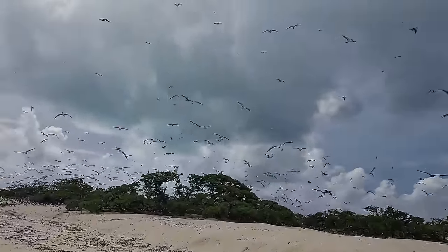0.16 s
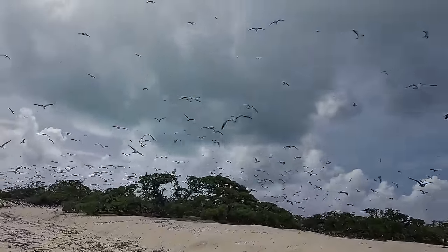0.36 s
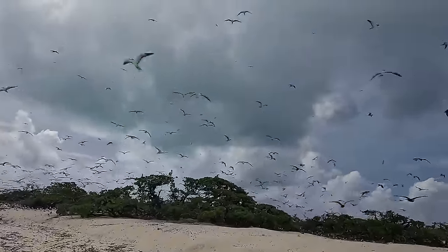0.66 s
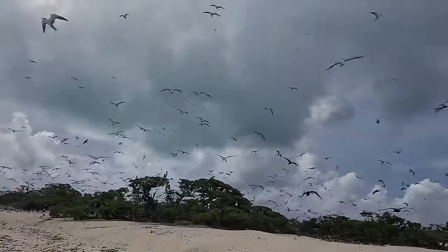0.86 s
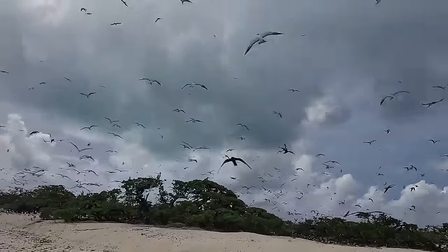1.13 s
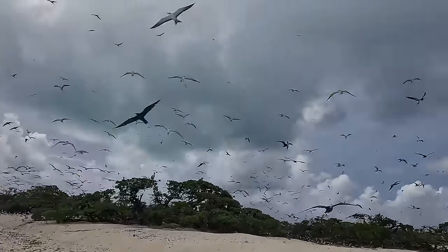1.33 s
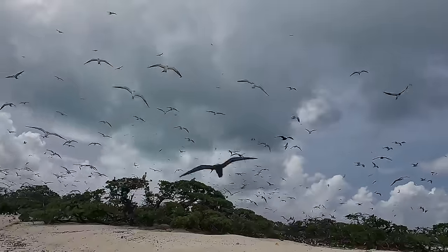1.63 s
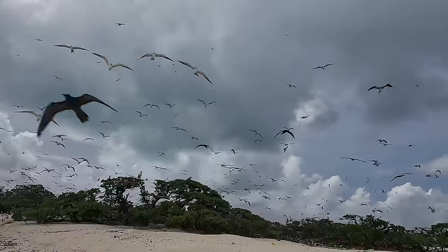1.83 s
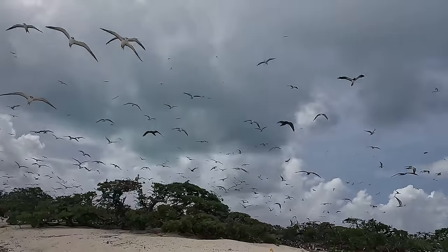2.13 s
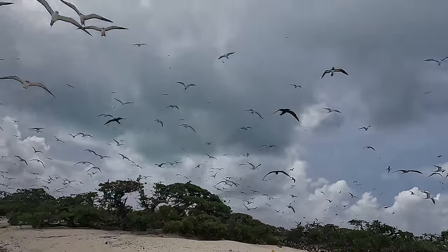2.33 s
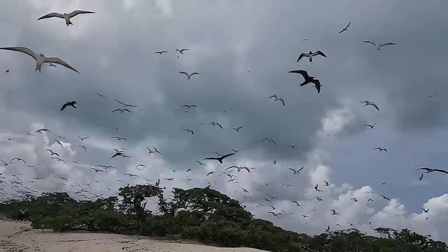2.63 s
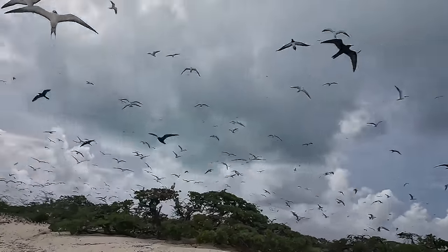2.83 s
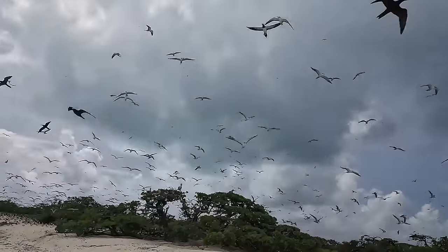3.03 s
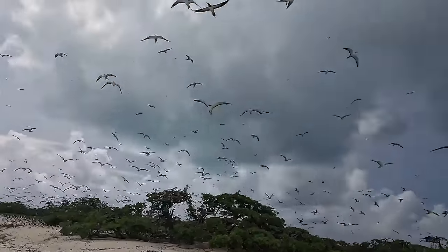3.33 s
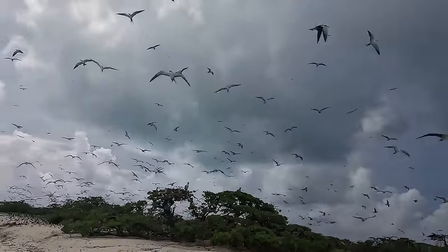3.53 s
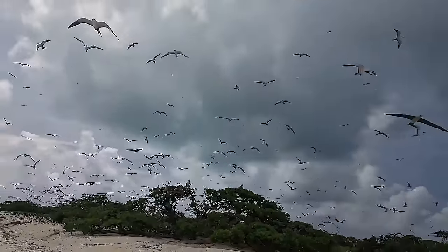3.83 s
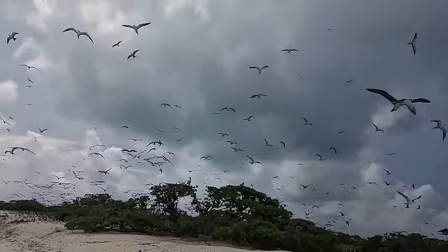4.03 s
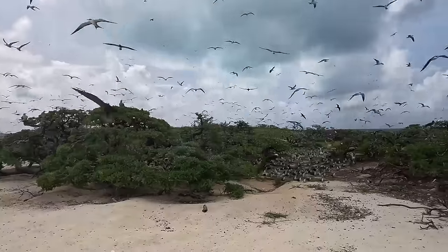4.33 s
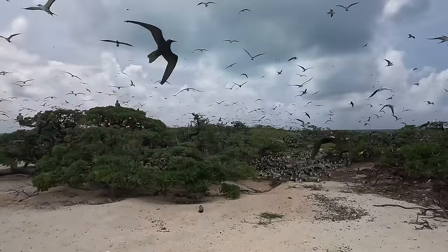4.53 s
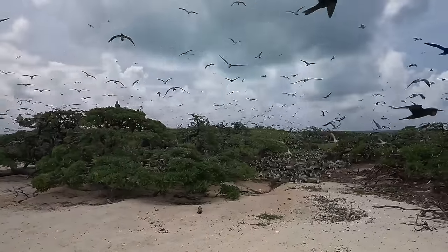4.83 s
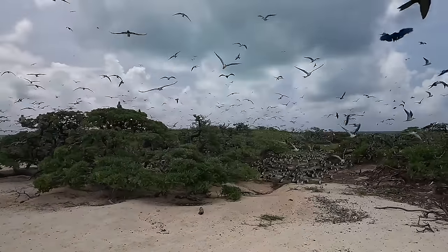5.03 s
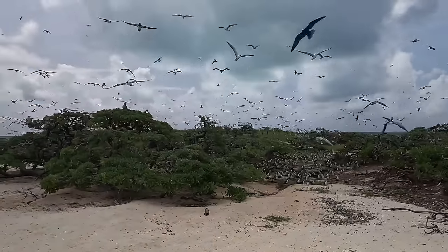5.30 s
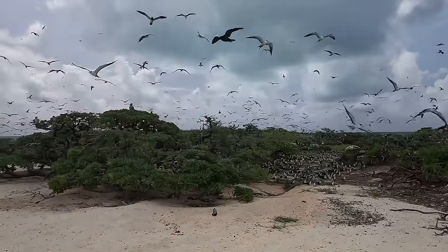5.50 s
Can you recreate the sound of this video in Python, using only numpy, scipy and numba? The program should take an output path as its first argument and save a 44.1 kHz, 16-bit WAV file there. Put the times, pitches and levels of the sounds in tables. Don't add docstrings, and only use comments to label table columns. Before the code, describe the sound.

A huge tern colony shrieks overhead in a high rasping din, with close cries, wind thumps and one abrupt short dropout.

```python
import sys
import numpy as np
from scipy import signal
from scipy.fft import rfft, irfft
from scipy.io import wavfile
from scipy.ndimage import uniform_filter1d, minimum_filter1d
from numba import njit

SR = 44100
rng = np.random.default_rng(int(sys.argv[2]) if len(sys.argv) > 2 else 0)


def dump(signal):
    limited = np.clip(np.atleast_2d(signal).T, -1, 1)
    pcm = np.round(limited * 32767).astype(np.int16)
    wavfile.write(sys.argv[1], SR, pcm)


def nominal_scale(level):
    x = np.asarray(level, float) / 20
    return 10 ** x


N = 249606

# freq_hz, density_db_per_hz
VOICE_COLOUR = [(470, -32.5), (800, -24.5), (1070, -26), (1250, -24.5), (2270, -1.5), (2620, 1), (3690, -8),
                (4100, -14.5), (5160, -11.5), (6250, -27), (7140, -27.5), (7860, -36.5), (8500, -45.5),
                (8750, -47.5)]
# freq_hz, density_db_per_hz
TREBLE_COLOUR = [(9200, -48), (9600, -44.5), (10400, -41), (10900, -51), (11300, -59.5), (12000, -58),
                 (12800, -61.5), (13500, -67.5), (15000, -73)]
NULL_FROM_HZ, NULL_TO_HZ = 8760, 9230


def birds():
    hz = np.fft.rfftfreq(N, 1 / SR)
    above_null = response(TREBLE_COLOUR) * (hz > NULL_TO_HZ)
    colour = np.where(hz < NULL_FROM_HZ, response(VOICE_COLOUR), above_null)
    mass, loudness = flock(colour)
    return irfft((rfft(mass) + rfft(close_birds()) / loudness) * colour, N)


def flock(colour):
    level_db, bright_db = flock_db()
    blur_colour = response([(1000, 2.5), (3000, -0.5), (15000, -9.0)])
    distant = irfft(rfft(rng.standard_normal(N)) * blur_colour, N)
    callers = crowd(count=520, spread_db=12, tilt_db=-.2, uneven_db=2.5, rough=.015)
    far = nominal_scale(-7.5) * unit(distant) + nominal_scale(-1.2) * callers
    heard = irfft(rfft(far) * colour, N)
    steady = far / np.sqrt(uniform_filter1d(heard ** 2, int(.07 * SR)))
    hz = np.fft.rfftfreq(N, 1 / SR)
    upper = irfft(rfft(steady) * np.clip((hz - 3500) / 1000, 0, 1), N)
    mass = (steady + upper * (nominal_scale(bright_db) - 1)) * nominal_scale(level_db + duck_db() + 0.42)
    return mass, np.std(heard)


# time_s, level_db, brightness_db
FLOCK_PASSES = [
    [(0.02, -16, .5), (.45, -17.5, 0), (.82, -17.5, 1), (1.05, -21, 1), (1.26, -17, -2), (1.5, -17.5, 1.5),
     (1.7, -15.5, 1), (2.3, -16.5, -1), (2.56, -14.5, 1), (2.82, -18, -2), (3.03, -16.5, 3),
     (3.2, -18.5, -0.3), (3.55, -16.5, 2), (4.16, -19, 0)],
    [(4.381, -15.5, 1.5), (4.86, -14.5, 0.5), (5.0, -14, 1.5), (5.63, -16, -0.5)],
]
# time_s, width_s, level_db, brightness_db
FLOCK_SURGES = [(.2, 0.035, 0.5, -0.5), (.69, 0.014, -4, -2), (.87, 0.022, -2, 1.5), (1.1, .04, -1, -2.5),
                (1.63, .04, 1.5, 0), (2.3, .03, -.5, -2.5), (3.6, .04, -0.5, 3), (3.76, .07, 0, -2.5),
                (3.96, .05, -.5, 3.5), (4.54, .04, -1.5, -2), (4.885, .02, -2.5, -1), (5.46, 0.023, -4, 1),
                (5.577, .025, -1, -5.5)]


def flock_db():
    t = np.arange(N) / SR
    levels = np.array(curve(FLOCK_PASSES))
    for s, width_s, level_db, bright_db in FLOCK_SURGES:
        levels += np.exp(-((t - s) / width_s) ** 2) * np.array([[level_db], [bright_db]])
    return levels


# time_s, pitch_share of the bird's own, level_db
TERN_CALL = [
    [(0, 0.77, -13.5), (.03, 0.75, -1.5), (.06, .84, 1.5), (.085, 1.03, 5), (.12, 1.14, -1)],
    [(.14, 1.1, -1), (.165, .96, -2)],
    [(.18, .98, -1), (.2, 1.04, -3.5), (.225, .97, -8.5)],
]


def crowd(count, spread_db, tilt_db, uneven_db, rough):
    out, wobble = np.zeros(N), rough * walk(250)
    for when, high, slow, wide, far, shift in rng.random((count, 6)):
        partials = throat(tilt_db, uneven_db)
        for note in TERN_CALL:
            s, share, db = np.transpose(note)
            s = when * (N / SR + .3) - .3 + s * (.5 + .55 * slow)
            hz = share ** (1.4 * wide - .35) * (680 + 360 * high)
            if 0 < s[0] < N / SR:
                points = np.transpose([s, hz, db - spread_db * far])
                sing(out, points, wobble[int(shift * N / 2):], partials, .012)
    return unit(out)


# freq_hz, gain_db
CLOSENESS_COLOUR = [(900, 1), (1400, 2.5), (1900, -17), (2300, -3), (2800, -4), (3300, 0.5), (3900, 1.5),
                    (5500, 0.5), (6500, -1.5), (10000, -0.5), (14000, 0.5)]
DUCK_FROM_DB, DUCK_RATIO, DUCK_S = -22.5, 0.84, .03
AIR_DB = .03


def close_birds():
    close, wobble = np.zeros(N), 0.0035 * walk(250)
    for note, (tilt_db, third_db) in close_notes():
        slope_db = tilt_db + AIR_DB * (note[1][2] - DUCK_FROM_DB)
        third_harmonic = nominal_scale(third_db * (np.arange(32) == 2))
        partials = throat(slope_db, uneven_db=1.1) * third_harmonic
        sing(close, note, wobble[int(note[0][0] * SR / 2):], partials, .01)
    return irfft(rfft(close * nominal_scale(-3.5)) * response(CLOSENESS_COLOUR), N)


# start_s, length_s, low_hz, top_hz, level_db
SWOOP_NOTES = [(.065, .1, 717, 1106, -28.5), (0.214, .05, 870, 1066, -21), (.43, .105, 714, 1043, -21.5),
               (0.636, 0.042, 831, 1026, -32), (3.182, .06, 695, 730, -28.5), (4.575, .065, 761, 832, -22),
               (4.981, .14, 581, 886, -22.5), (5.123, .06, 759, 963, -23), (5.247, .07, 641.4, 792, -24.5),
               (5.376, .112, 662, 1077, -22.5), (5.56, .045, 610, 643, -24.5)]
# start_s, length_s, start_hz, end_hz, level_db
CLIMB_NOTES = [(.32, .035, 833, 969, -26.5), (.84, .05, 873, 910, -27), (0.923, .03, 807, 840, -28.5),
               (1.245, .03, 843, 864, -27), (1.455, .03, 842, 959, -23), (1.662, .04, 993, 1037, -28.5),
               (1.714, .025, 968, 987, -22.5), (1.912, .08, 891, 1138, -19.5),
               (2.051, .032, 1100, 1128, -22), (2.17, .045, 699, 803.4, -27),
               (2.746, 0.04, 833, 881.4, -29), (2.865, .085, 952, 1032, -28.5),
               (3.0, .065, 843, 909, -24.5), (3.223, .03, 871, 891, -25), (3.546, .045, 636, 720, -23),
               (3.6, 0.039, 917, 970, -22.5), (3.76, .045, 737, 786, -30.5), (4.38, 0.019, 945, 1063, -22),
               (4.717, .045, 852, 1012, -18.5), (4.768, .042, 672, 730, -21), (5.292, .022, 858, 982, -21),
               (5.318, .039, 864, 1078, -16.5)]
# start_s, length_s, start_hz, end_hz, level_db
DROP_NOTES = [(.55, .015, 987, 890, -21), (.575, 0.019, 932, 850, -23), (.72, .025, 673, 622, -24.5),
              (1.295, 0.039, 940, 903.8, -25.5), (1.86, .035, 928, 803, -22),
              (2.215, 0.023, 804, 687, -24.5), (2.7, .03, 738, 703, -25), (3.82, .03, 918, 900, -31),
              (4.435, .025, 775, 729, -21.5), (4.66, .035, 826, 819.8, -21.5),
              (4.64, .024, 838, 692, -24.5), (5.365, .06, 957, 942, -16), (5.52, .015, 885, 865, -20)]
# start_s, length_s, edge_hz, middle_hz, level_db
ARCH_NOTES = [
    (3.46, .08, 840, 965, -26.5),
    (4.815, .06, 810, 870, -24),
    (5.039, .09, 815, 992, -20),
    (5.225, .092, 1060, 814, -21),
]
# start_s, length_s, start_hz, end_hz, level_db
SLIDE_NOTES = [
    (2.016, .027, 1150, 965, -20.5),
    (2.118, .024, 861, 985, -20),
    (3.4, .045, 935, 856, -26.5),
    (3.55, .04, 830, 965, -26),
    (5.16, .045, 835, 1055, -20),
    (3.05, .06, 905, 830, -24.5),
    (5.085, .04, 830, 905, -22.5),
    (.185, .03, 830, 985, -22.5),
]
# length_share, glide_share, level_db
SWOOP_SHAPE = [(0, .05, 1), (.25, 0, -1.5), (.48, .12, -2), (.72, .78, 0.5), (1, 1, 2)]
# length_share, glide_share, level_db
CLIMB_SHAPE = [(0, 0, 0), (.5, .6, .5), (1, 1, -0.22)]
# length_share, glide_share, level_db
DROP_SHAPE = [(0, 0, 1), (.4, .2, 0.61), (1, 1, -1.2)]
# length_share, glide_share, level_db
ARCH_SHAPE = [(0, 0.021, -0.91), (0.219, .65, 0), (.45, 0.96, .5), (.72, .75, -0.088), (1, 0.025, -.5)]
# length_share, glide_share, level_db
SLIDE_SHAPE = [(0, 0, 0), (.4, 0.63, 0.46), (1, 1, -.5)]
# slope in dB per harmonic, lift of the third harmonic in dB
SHRILL, MELLOW = (-.025, 0), (-.35, 6)


def close_notes():
    kinds = ((SWOOP_NOTES, SWOOP_SHAPE, SHRILL), (CLIMB_NOTES, CLIMB_SHAPE, SHRILL),
             (DROP_NOTES, DROP_SHAPE, SHRILL), (ARCH_NOTES, ARCH_SHAPE, MELLOW),
             (SLIDE_NOTES, SLIDE_SHAPE, MELLOW))
    notes = []
    for rows, shape, voice in kinds:
        for s, length_s, start_hz, end_hz, level_db in rows:
            points = [(s + at * length_s, start_hz + glide * (end_hz - start_hz), level_db + db)
                      for at, glide, db in shape]
            notes.append((points, voice))
    return notes


def duck_db():
    t, over = np.arange(N) / SR, np.zeros(N)
    for rows in (SWOOP_NOTES, CLIMB_NOTES, DROP_NOTES, ARCH_NOTES, SLIDE_NOTES):
        for s, length_s, _, _, level_db in rows:
            sounding = (t > s) & (t < s + length_s)
            over = np.maximum(over, sounding * max(level_db - DUCK_FROM_DB, 0))
    return -DUCK_RATIO * uniform_filter1d(over, int(DUCK_S * SR))


def throat(tilt_db, uneven_db):
    size, turn = rng.standard_normal(32), rng.random(32)
    return nominal_scale(tilt_db * np.arange(len(size)) + uneven_db * size) * np.exp(2j * np.pi * turn)


def sing(out, note, shake, partials, edge_s):
    s, hz, db = np.transpose(note)
    t = np.arange(max(s[0] - edge_s / 2, 0), s[-1] + edge_s / 2, 1 / SR)
    pitch = uniform_filter1d(np.interp(t, s, hz), int(.012 * SR)) * (1 + shake[:len(t)])
    edge = np.clip(np.minimum(t - s[0] + edge_s / 2, s[-1] + edge_s / 2 - t) / edge_s, 0, 1)
    strength = nominal_scale(np.interp(t, s, db) + 210 * shake[-len(t):])
    syrinx(out, int(t[0] * SR), pitch, strength * edge ** 2, partials)


@njit
def syrinx(out, start, hz, gain, partials):
    turn = 0.
    for i in range(min(len(hz), len(out) - start)):
        turn += hz[i] / SR
        z = np.exp(2j * np.pi * turn)
        p, total = z, 0.
        for k in range(min(int(15000 / hz[i]), len(partials))):
            total += (p * partials[k]).imag
            p *= z
        out[start + i] += gain[i] * total


# freq_hz, density_db_per_hz
TURBULENCE_COLOUR = [(15, -36.5), (27, -11), (48, -1.5), (92, -0.5), (358, -5), (482, -6.5), (818, -5.5),
                     (1030, -11), (1300, -4), (1690, -33), (2860, -120)]
# time_s, rush_share (0-1), pitch_hz
PORT_WHISTLE = [
    (3.2, 0.01, 391),
    (3.3, 0.65, 384),
    (3.58, 0.97, 372),
    (3.72, 0.94, 400),
    (3.8, 0.76, 437),
    (3.87, 0.91, 550),
    (3.96, 0.6, 514),
    (4.03, 0, 500),
]


def wind():
    share, whistle_hz = curve([PORT_WHISTLE])
    share = np.clip(share, 0, 1)
    buffet_db, rush_db = gusts(share)
    hz = np.fft.rfftfreq(N, 1 / SR)
    air = rfft(rng.standard_normal(N)) * response(TURBULENCE_COLOUR)
    edges_hz = [0, 55, 290, 750, 3000]
    bands = [unit(irfft(air * (hz > a) * (hz <= b), N)) for a, b in zip(edges_hz, edges_hz[1:])]
    deep, low, rush, surf = bands
    out = deep * nominal_scale(0.97 * buffet_db - 13 + 3.8 * walk(9.9))
    out += low * nominal_scale(buffet_db - 0.24 + 2.26 * walk(18))
    whistle = svf(rng.standard_normal(N), whistle_hz, 140.)
    whistle = unit(svf(whistle, whistle_hz, 180.))
    over_port = np.sqrt(1 - share) * rush + np.sqrt(share) * whistle
    out += over_port * nominal_scale(rush_db - 0.4 + 0.85 * walk(20))
    out += surf * nominal_scale(0.24 * rush_db - 35.0)
    return out + thumps()


# time_s, level_db
STEADY_WIND = [
    [(0.03, -39.5), (.2, -37), (.5, -38.5), (.9, -44.5), (1.4, -40), (1.9, -39), (2.5, -38.5), (3.0, -41),
     (3.35, -37), (3.8, -33), (4.16, -26.5)],
    [(4.381, -39), (4.6, -40.5), (4.74, -36), (5.07, -42), (5.3, -38.5), (5.62, -37.5)],
]
# time_s, width_s, lift_db, rush_share
WIND_GUSTS = [(.084, 0.048, 5.5, 1.2), (.543, .025, 7.5, 1.4), (.65, .025, 12, 1), (.697, .015, -4, 1.1),
              (.78, 0.025, 16, 0.67), (1.33, .04, 3.5, 1), (1.783, 0.045, 2, 0.28), (3.132, 0.053, 5, .8),
              (3.604, 0.048, 8.5, 0.53), (3.748, 0.022, 6, 0), (3.961, 0.028, 12, 0.43),
              (4.656, 0.029, 3.5, 1.2), (5.375, 0.034, 7, .2)]
RUSH_FOLLOWS, RUSH_DB, WHISTLE_LIFT_DB = .5, -20.5, 10


def gusts(share):
    t, (steady_db,) = np.arange(N) / SR, curve([*STEADY_WIND])
    buffet_db = steady_db.copy()
    rush_db = RUSH_DB + RUSH_FOLLOWS * steady_db + WHISTLE_LIFT_DB * share
    for s, width_s, lift_db, felt in WIND_GUSTS:
        bell_db = lift_db * np.exp(-((t - s) / width_s) ** 2)
        buffet_db += bell_db
        rush_db += bell_db * felt
    return buffet_db, rush_db


# time_s, peak_db, pitch_hz
DIAPHRAGM_THUMPS = [(0.54, -26, 67.3), (0.642, -15, 184), (0.719, -22, 115.6), (0.775, -20, 105),
                    (3.144, -16, 72.7), (3.689, -19, 110), (3.739, -14.5, 173), (3.954, -20, 167.4),
                    (3.958, -8, 99.6), (3.979, -9, 138.5), (4.099, -14.5, 195), (5.359, -17, 121)]


def thumps():
    out, t = np.zeros(N), np.arange(int(.05 * SR)) / SR
    for s, db, hz in DIAPHRAGM_THUMPS:
        push = np.sin(2 * np.pi * hz * t) * np.exp(-t / 0.0082) * (1 - np.exp(-t / 0.0019))
        out[int(s * SR):int(s * SR) + len(t)] += nominal_scale(db + 0.8) * push
    return out


# freq_hz, density_db_per_hz
HISS_COLOUR = [(24, -33), (40, 0), (1150, -4), (2000, -5), (2550, 2), (3630, -7), (4430, -2.5),
               (6880, -5.5), (8000, -14), (9000, -30), (11000, -25), (15000, -30), (16000, -80)]


def side_hiss():
    side = unit(irfft(rfft(rng.standard_normal(N)) * response(HISS_COLOUR), N))
    return nominal_scale(-54.5) * side * np.array([[1], [-1]])


def curve(tables):
    s, *columns = np.transpose(np.concatenate(tables))
    return [np.interp(np.arange(N) / SR, s, c) for c in columns]


def unit(x):
    return x / np.sqrt(np.mean(x ** 2))


def response(table):
    hz, db = np.transpose(table)
    return nominal_scale(np.interp(np.log(np.fft.rfftfreq(N, 1 / SR) + 1), np.log(hz), db))


def walk(rate):
    k = int(SR / rate)
    held = np.repeat(rng.standard_normal(N // k + 1), k)
    return unit(uniform_filter1d(uniform_filter1d(held, k), k)[:N])


@njit
def svf(x, hz, width):
    y, b, l = np.empty(len(x)), 0., 0.
    for i in range(len(x)):
        g, k = np.tan(np.pi * hz[i] / SR), width / hz[i]
        v = (b + g * (x[i] - l)) / (1 + g * (g + k))
        b, l, y[i] = 2 * v - b, l + 2 * g * v, k * v
    return y


def limit(x, top, hold_s):
    size = int(hold_s * SR)
    gain = np.minimum(1, top / (np.abs(x).max(axis=0) + 1e-9))
    return x * uniform_filter1d(minimum_filter1d(gain, 2 * size), size)


def scene():
    return birds() + wind() + side_hiss()


def low_pass(x):
    return signal.sosfilt(signal.butter(12, 15130, fs=SR, output="sos"), x)


# start_s, end_s, pitch_hz, start_db, end_db
GAP_RING = [
    (4.188, 4.211, 2105, -28.5, -52),
    (4.26, 4.28, 2090, -62, -59),
]
CUT_S, FADE_FROM_S, FADE_TO_S = 4.188, 4.277, 4.3635


def record(dry):
    t = np.arange(N) / SR
    fade_in = np.clip((t - FADE_FROM_S) / (FADE_TO_S - FADE_FROM_S), 0, 1) ** 1.34
    stop = np.clip((CUT_S - t) / 0.0013, 0, 1)
    out = limit(dry, top=.78, hold_s=.004) * np.where(t < CUT_S, stop, fade_in)
    for start, end, hz, start_db, end_db in GAP_RING:
        on = (t > start) & (t < end)
        level = nominal_scale(np.interp(t, [start, end], [start_db, end_db]))
        out = out + on * level * np.sin(2 * np.pi * hz * t)
    return low_pass(out)


dry = scene()
out = record(dry)
dump(out)
```